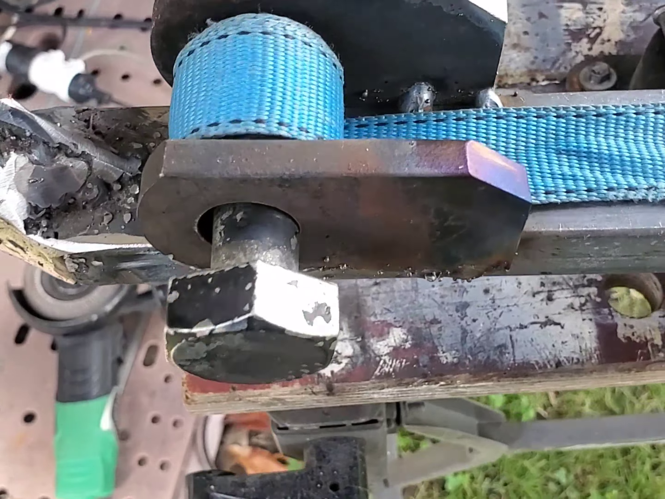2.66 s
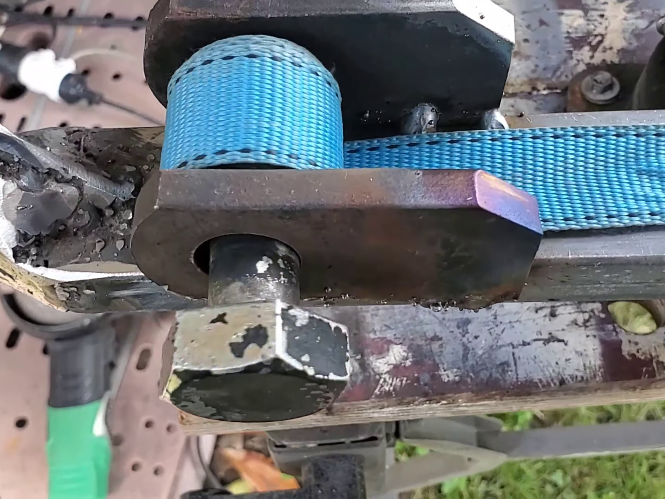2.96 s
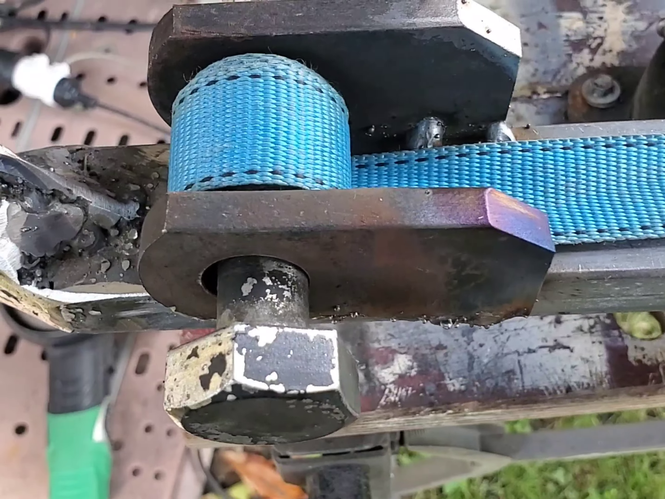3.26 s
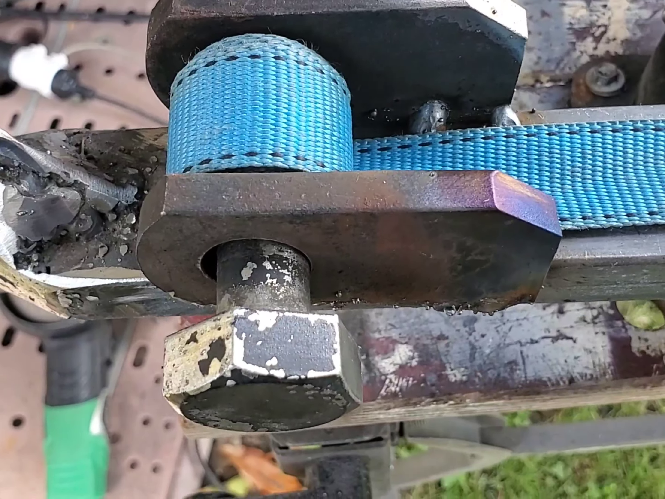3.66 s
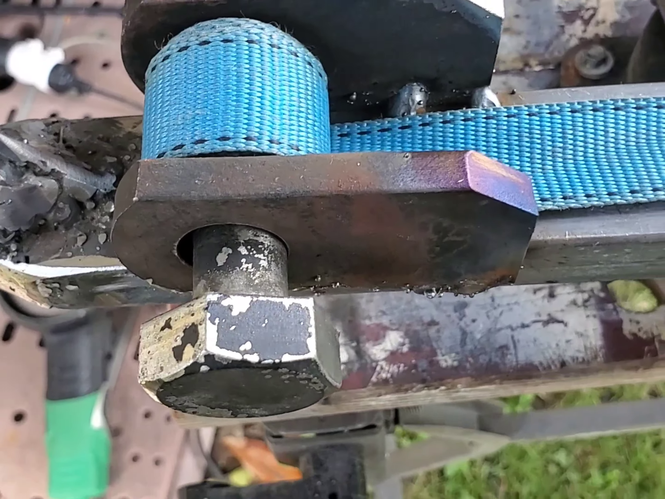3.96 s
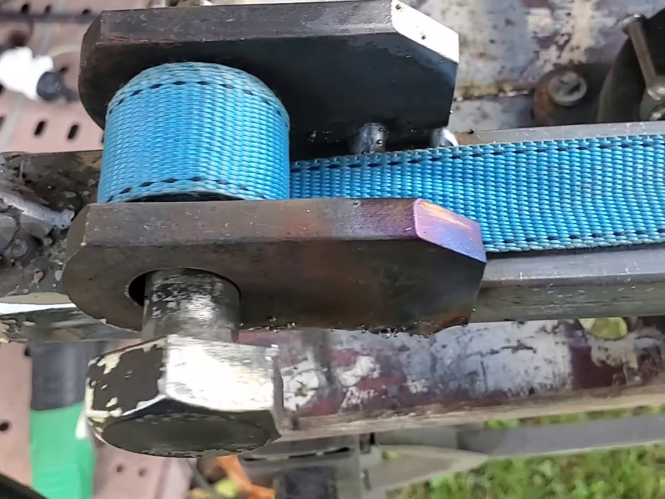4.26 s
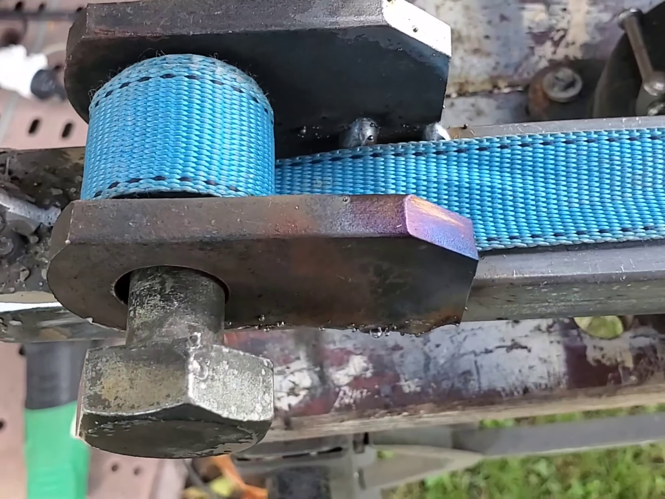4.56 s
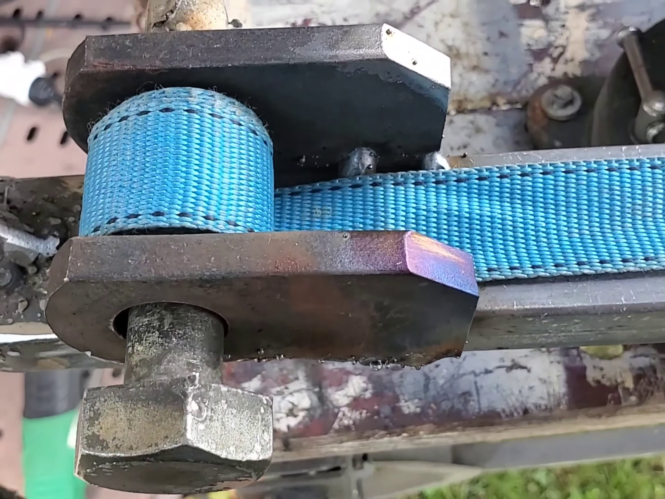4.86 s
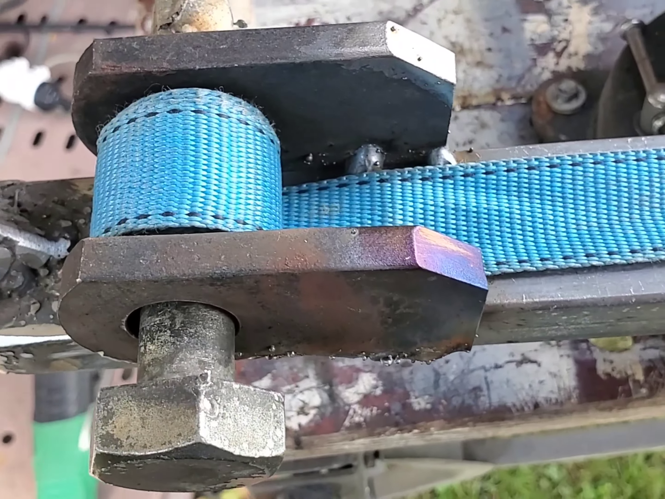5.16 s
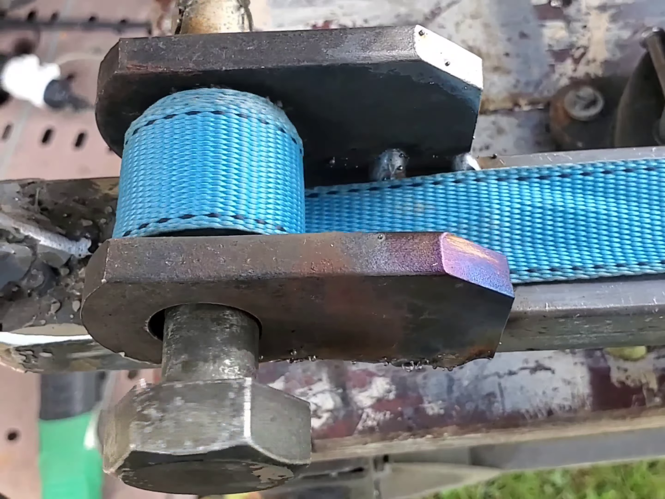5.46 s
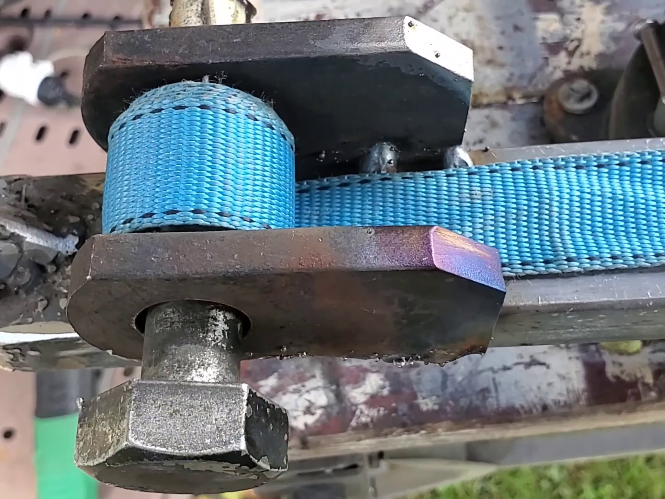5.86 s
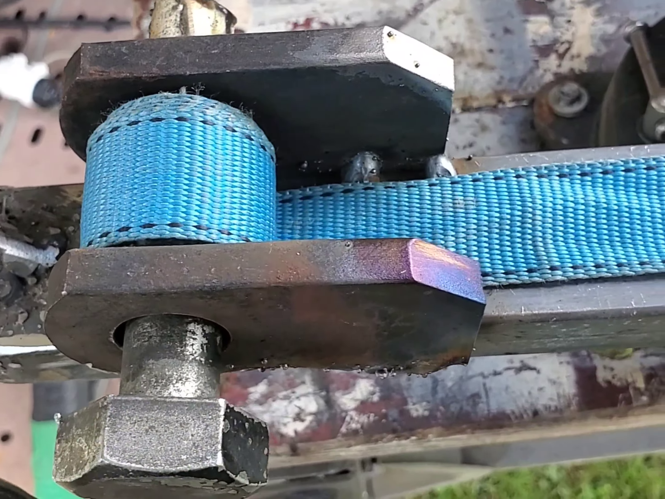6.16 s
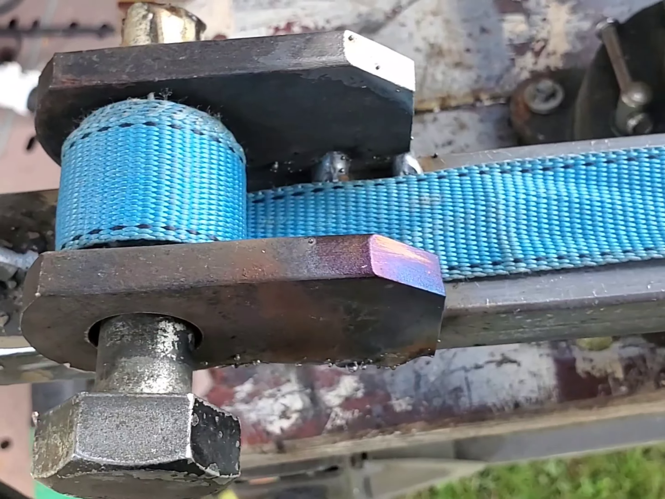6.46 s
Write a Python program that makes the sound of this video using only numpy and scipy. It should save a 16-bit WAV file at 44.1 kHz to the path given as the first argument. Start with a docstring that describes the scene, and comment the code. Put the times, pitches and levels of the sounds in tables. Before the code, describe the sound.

A steel ratchet tie-down clacks close up outdoors, sparse at first, then quick uneven metallic clicks with light scraping over a faint engine hum.

```python
"""A pawl clacks into a ratchet tooth at once and the small steel frame of a strap winch rings on, outdoors, close
to the microphone. Drops, rebounds, ticks and knocks are short noise cracks with a dense noise ring and decaying
sine modes. Between the teeth the parts scrape faintly: uneven noise coloured by the same steel modes.
Far off, an engine hums as a wandering tone with its octave, over a low rumble and a traffic wash of shaped noise."""
import sys
import numpy as np
from scipy import signal
from scipy.fft import rfft, irfft, next_fast_len
from scipy.io import wavfile
from scipy.ndimage import uniform_filter1d, map_coordinates

SR = 44100
rng = np.random.default_rng(int(sys.argv[2]) if len(sys.argv) > 2 else 0)


def digitize_waveform(pressure):
    """Quantize a signal to 16-bit integers and store it at the path in sys.argv[1].

    Rows of a 2-D input are taken as channels; values are limited to [-1, 1].
    """
    field = np.atleast_2d(pressure).T
    bounded = np.clip(field, -1, 1)
    quanta = np.round(bounded * 32767).astype(np.int16)
    wavfile.write(sys.argv[1], SR, quanta)


N = 292381  # length [samples]


def amp(db):
    """Decibels to linear gain."""
    return 10 ** (np.asarray(db) / 20)


def unit(x):
    """Scale a signal to rms 1."""
    return x / np.sqrt(np.mean(x ** 2) + 1e-20)


def along(points, hz):
    """Read a (frequency, value) curve at hz, straight between points on a log frequency axis."""
    point_hz, value = np.transpose(points)
    return np.interp(np.log(hz + 1), np.log(point_hz + 1), value)


def curves(rows):
    """Draw each column after the time as one value per sample."""
    seconds, *columns = np.transpose(rows)
    return [np.interp(np.arange(N) / SR, seconds, column) for column in columns]


def wobble(rate):
    """Smooth random curve with rate knots a second."""
    knots = rng.standard_normal(int(N * rate / SR) + 4)
    return map_coordinates(knots, [np.arange(N) * rate / SR])


# likeness of the left and right channels: (frequency [Hz], correlation [-1 to 1])
LIKENESS = [(40, .6), (70, .85), (130, .93), (290, .86), (640, .6), (1400, .53), (3100, -.2), (7000, -.15),
            (15000, .2)]


def pair(count, gain, lean=((1, 0),)):
    """Stereo noise coloured by gain(Hz), alike in the bass and nearly unrelated in the treble; rms 1."""
    m = next_fast_len(count)
    hz = np.fft.rfftfreq(m, 1 / SR)
    turn = np.arccos(np.clip(along(LIKENESS, hz), -1, 1)) / 2
    spectra = rfft(rng.standard_normal((2, m))) * gain(hz)
    mid, side = spectra * [np.cos(turn), np.sin(turn)]
    balance = amp(along(lean, hz) * [[.5], [-.5]])
    return unit(irfft([mid + side, mid - side] * balance, m)[:, :count])


# the open air around the winch: (time [s], rumble level [dB], traffic level [dB])
OUTDOOR_LEVELS = [(0, -57.5, -56), (.7, -53.5, -59.5), (1.2, -59.5, -63.5), (2.4, -57, -58),
                  (3.3, -59, -60.5), (4.7, -51.5, -60), (5.8, -54.5, -57), (6.63, -59, -58)]
# colour of the low rumble: (frequency [Hz], level [dB per Hz])
RUMBLE_COLOUR = [(20, -42), (33, -15.5), (42, 1), (60, 0.5), (90, -2), (140, -30.5), (260, -42)]
# colour of the far traffic: (frequency [Hz], level [dB per Hz])
TRAFFIC_COLOUR = [(65, -44), (110, -3), (150, -6.5), (214, -5.5), (317, -11), (510, -8), (930, -19.5),
                  (1530, -28), (3900, -25.5), (9000, -33.5), (15600, -50)]


def outdoors():
    """Lumpy rumble and the wash of far traffic: two shaped noises, a touch stronger on the right."""
    rumble_db, traffic_db = curves(OUTDOOR_LEVELS)
    rumble = amp(rumble_db + 0.8 * wobble(6.6)) * pair(N, lambda hz: amp(along(RUMBLE_COLOUR, hz)))
    wash = amp(traffic_db + 0.71 * wobble(7)) * pair(N, lambda hz: amp(along(TRAFFIC_COLOUR, hz)))
    return (rumble + wash) * amp([[-.4], [.4]])


# the far engine's low tone, before its wobbles: (time [s], pitch [Hz], level [dB])
ENGINE_TONE = [(0, 79, -63.5), (1.15, 81, -68), (1.75, 78.6, -62.5), (2.15, 75.97, -52),
               (2.75, 75.93, -54.5), (3.25, 80, -52), (3.5, 82.2, -66.5), (3.75, 83.2, -65),
               (4.08, 87.6, -54), (4.3, 88, -66), (4.45, 90.3, -53.5), (5, 94.4, -56), (5.2, 94.1, -45),
               (5.61, 93.8, -59.5), (5.82, 93.5, -48.5), (6.06, 90, -61), (6.63, 88.5, -66.5)]
# the octave against the tone, lifted as it crosses an exhaust boom
OCTAVE_DB, BOOM_DB, BOOM_HZ, BOOM_WIDTH_HZ = -15, 9.5, 163, 8.9


def engine():
    """A far engine: an unsteady low tone and its octave, a little off to the right."""
    hz, tone_db = curves(ENGINE_TONE)
    boom_db = BOOM_DB / (1 + ((2 * hz - BOOM_HZ) / BOOM_WIDTH_HZ) ** 2)
    octave_db = tone_db + OCTAVE_DB + boom_db
    wandering_hz = hz * (1 + 0.0083 * wobble(23))
    phase = 2 * np.pi * np.cumsum(wandering_hz) / SR + [[.15], [-.15]]  # left leads
    tone = amp(tone_db + 2.6 * wobble(9)) * np.sin(phase)
    octave = amp(octave_db + 3.7 * wobble(7.2)) * np.sin(2 * phase)
    return np.sqrt(2) * (tone + octave) * amp([[-.4], [.4]])


# drag between the teeth: (time [s], level [dB])
SCRAPE_LEVEL = [(0, -61.5), (.4, -52.5), (.7, -55), (.9, -79), (1.08, -59.5), (1.25, -72.5), (1.52, -57.5),
                (1.65, -64), (2.1, -60.5), (2.58, -46.5), (2.8, -55.5), (3.45, -57), (3.68, -46),
                (3.98, -58.5), (4.8, -54.5), (5.33, -55), (5.7, -52), (5.86, -48), (6.03, -52.5),
                (6.63, -55.5)]
# colour of the drag before the steel sings: (frequency [Hz], level [dB per Hz])
RUB_COLOUR = [(350, -26), (600, -6.5), (1810, -6), (2070, -11), (3340, -6.5), (3780, -5), (5460, -18.5),
              (6520, -16), (15600, -23)]


def scrape():
    """Pawl and strap drag between the teeth: uneven grit, with resonant peaks at the steel modes."""
    level_db, = curves(SCRAPE_LEVEL)

    def sing(f):
        return 1 + sum(amp(12 + db) / (1 + ((f - hz) / 30) ** 2) for hz, db, *_ in STEEL_MODES)

    grit = amp(3 * wobble(25) + 2.2 * wobble(140))  # slow and fine unevenness
    rub = pair(N, lambda hz: amp(along(RUB_COLOUR, hz)) * sing(hz))
    return amp(level_db) * unit(grit * rub)


def colour(hz, bright_db, body_db):
    """What a contact favours: treble against bass about 6.5 kHz, and clack around 1.6 kHz."""
    treble = np.tanh(1.68 * np.log((hz + 1) / 6500)) / 2
    body = np.exp(-(np.log((hz + 1) / 1600) / 0.5) ** 2)
    return amp(bright_db * treble + body_db * body)


# clear modes of the steel frame: (frequency [Hz], level on a winding stroke [dB], level on a return stroke [dB],
# time to fall 60 dB [s] before a common stretch, phase by which left leads [rad] before random spread)
STEEL_MODES = [(388, -14, -28, 0.22, -0.1), (920, -20, -18, 0.2, 2.0), (1060, -19, -24, 0.2, 1.0),
               (1399, -17, -28, 0.2, 1.8), (1668, -14, -16, 0.13, 1.3), (2051, -14, -9, 0.11, -0.6),
               (2330, -10, -10, 0.13, 0.9), (3003, -1, -4, 0.2, 0.6), (3299, -4, -9, 0.23, 2.8),
               (3577, -10, -11, 0.22, 0.7), (4080, -8, -5, 0.19, 1.0), (4200, -9, -6, 0.25, 1.7),
               (4548, -10, -5, 0.19, -2.9), (4705, -7, -9, 0.21, 0.7), (4850, -15, -11, 0.23, -0.8),
               (5227, -8, -7, 0.18, -1.2), (5302, -4, -7, 0.15, 0.6), (5496, -7, -9, 0.21, -2.7),
               (5763, -7, -5, 0.15, -2.8), (6086, -13, -9, 0.2, 0.6), (6208, -14, -9, 0.2, 1.6),
               (6548, -12, -1, 0.15, -2.8), (6785, -15, -14, 0.22, -2.4), (6950, -12, -10, 0.24, 0.9),
               (7638, -14, -15, 0.19, -2.8), (8538, -12, -13, 0.15, 0.7), (8769, -13, -14, 0.18, -1.1),
               (9140, -14, -17, 0.17, 0.3), (10518, -20, -12, 0.18, -2.5)]


def ringing(t, winding, bright_db, body_db):
    """The steel modes at new strengths; loose joints let their phase wander, so none rings like glass."""
    hz, winding_db, return_db, t60, lead = np.transpose(STEEL_MODES)[:, :, None]
    count = len(STEEL_MODES)
    strength, start_phase, spread = rng.standard_normal((3, count, 1))
    steps = rng.standard_normal((count, len(t) // 64 + 1))
    wander = np.cumsum(steps, 1).repeat(64, 1)[:, :len(t)]  # a random step every 64 samples
    level_db = (winding_db if winding else return_db) + 7.5 * np.tanh(.6 * strength)
    decay = amp(level_db - 60 * t / (1.065 * t60))
    build_up = 1 - np.exp(-t * hz / 6)  # over about six cycles
    envelope = decay * colour(hz, bright_db, body_db) * build_up
    phase = 2 * np.pi * hz * t + 2 * start_phase + .22 * hz / 5000 * wander
    half_lead = (lead + .5 * spread) / 2
    return np.array([np.sum(envelope * np.sin(phase + side * half_lead), 0) for side in (1, -1)])


# In the contact tables strength, ring, brightness and body are drive values; pawl() trims them for each layer.
# the pawl drops into a tooth:
# (time [s], strength [dB], rise [ms], ring against strength [dB], brightness [dB], body [dB])
TOOTH_DROPS = [(0.0, -19, .52, 2, 1.5, 7), (0.4168, -7, 1.1, -5, -4, -1.5), (0.5581, -8, 2, -4.5, 0.5, 6),
               (1.3475, -20, 1.6, -15.5, 14, 1.5), (1.669, -11.5, 5.9, -1.5, 4.5, 7.5),
               (1.8871, -6, 2.9, -7.5, 1, 5.5), (2.0534, -20, 1.9, -10, 12, 12.5),
               (2.2385, -22.5, 0.85, -2, 0, 9), (2.2594, -14.5, 2.6, 4, -1, -1),
               (2.3884, -12, 1.3, 0.7, -3, -4), (2.5061, -11.5, 3.3, -6.5, 9, 12.5),
               (2.859, -11, 5.1, -4, -0.5, 2.2), (3.0073, -11, 2, -3, -4.5, -2.5),
               (3.1994, -13, 3.1, -6.5, 9, 1), (3.364, -25.5, 8.1, -5.5, -1, 3.5),
               (3.5847, -16, .6, 4, -5, -5), (3.7171, -9.5, 1.6, -4, 0, 0.7),
               (3.8591, -7.5, 6.8, -12, 8.5, 14.5), (4.183, -14, 3.2, -3, 2, 1),
               (4.3183, -7, 5, -5, 6.5, 9), (4.4818, -12.5, 2.7, -5.5, -0.5, 0.5),
               (4.6516, -14.5, 1.69, -17, 8, 5), (4.7002, -15, 2.9, -7.5, 8, 9.5),
               (4.8708, -9.5, 1.5, -3, -2.5, 2), (4.9894, -11, 1.4, -2, -0.5, 5.5),
               (5.137, -9.5, 4.1, -14, 10.5, 12), (5.4319, -6, 5.9, -6.5, -6.5, 1.5),
               (5.5431, -15, 10.6, -1.5, 0.5, 9), (5.696, -10.5, 3.8, -5.5, 7.5, 6.5),
               (5.8775, -6, 1.6, -13, 8.5, 5.5), (5.98, -26.5, 2.2, -16, -3, -1),
               (6.073, -14.5, 8.3, 1.5, -1.5, -0.5), (6.2329, -14.5, 10, -1.5, 4, 14.5),
               (6.3728, -9.5, 1.44, -9.5, 4, 5)]
# the pawl rebounds after some drops: (time [s], strength [dB])
PAWL_REBOUNDS = [(.0095, -17), (1.9126, -15.5), (2.2826, -22), (3.02, -9), (4.4958, -14.5), (5.4445, -11.5),
                 (5.909, -25), (6.249, -24.5), (6.2646, -14.5)]
# shared by all rebounds: (rise [ms], ring against strength [dB], brightness [dB], body [dB])
REBOUND_SOUND = (2.2, -21.5, 6, 5)
# light ticks of loose parts, many just ahead of a drop as the pawl leaves the tooth tip:
# (time [s], strength [dB], brightness [dB])
LOOSE_TICKS = [(0.1531, -42, -24.5), (0.1846, -33, -8.5), (0.228, -45.5, 1), (0.304, -41.5, -9),
               (0.919, -58.5, -2), (1.013, -54, -14), (1.108, -54, -17), (1.431, -38.5, 4), (1.454, -30, 9),
               (1.481, -39, -28), (1.508, -42, 5), (1.6456, -35, 5), (1.874, -38.5, 3), (2.0327, -41, -28),
               (2.662, -41, -9), (2.69, -39.5, -1), (3.1697, -27, 24), (3.4007, -29, -1), (3.4138, -35, 4),
               (3.5774, -32, 1), (3.7124, -24, -6), (3.843, -37, -3), (4.0052, -38.5, 3),
               (4.0338, -39.5, -2), (4.171, -27.5, 4), (4.303, -27.5, 3), (4.465, -31.5, 0),
               (4.9758, -32, 2), (5.2689, -43, -5), (5.2874, -37.5, -4), (5.414, -23, 7), (5.4222, -18, 4),
               (5.5334, -26.5, 1), (5.6782, -32.5, -1.5), (6.212, -35.5, -2), (6.4897, -37.5, 3.5),
               (6.5057, -34.5, 8)]
TICK_RISE_MS, TICK_RING_DB, TICK_BODY_DB = 3.3, -4.5, 6.5
# dull knocks of the handle against the frame: (time [s], strength [dB])
HANDLE_KNOCKS = [(1.5076, -50), (5.941, -43), (6.5301, -37)]
# shared by all knocks: (rise [ms], ring against strength [dB], brightness [dB], body [dB])
KNOCK_SOUND = (5.5, -16.5, -21, 26)


def contacts():
    """Every blow, from drops to knocks, as a row with the columns of the drops."""
    ticks = [(s, db, TICK_RISE_MS, TICK_RING_DB, bright_db, TICK_BODY_DB)
             for s, db, bright_db in LOOSE_TICKS]
    rebounds = [(*row, *REBOUND_SOUND) for row in PAWL_REBOUNDS]
    knocks = [(*row, *KNOCK_SOUND) for row in HANDLE_KNOCKS]
    return TOOTH_DROPS + ticks + rebounds + knocks


# colour of the crack: (frequency [Hz], level [dB per Hz])
CRACK_COLOUR = [(290, -49), (500, -36.5), (1850, -18.5), (4150, 3), (4930, -7), (6970, -7), (7600, -12),
                (8770, -5.5), (11400, -7.5), (15600, -9)]
# balance of the crack between the channels: (frequency [Hz], left over right [dB])
CRACK_LEAN = [(500, -2.5), (1500, 8.5), (4000, -1), (8000, 10.5), (15000, 6)]
CRACK_ABOVE_HZ = 870  # the crack is cut below this, so it carries no bass


def crack_noise(t, onset, rise_ms, bright_db, body_db):
    """The blow itself: treble-heavy noise roughened by tiny rebounds, falling 60 dB in 30 ms after its rise."""
    crack = pair(len(t), lambda hz: amp(along(CRACK_COLOUR, hz)) * colour(hz, 1.42 * bright_db, body_db),
                 CRACK_LEAN)
    count = 60
    chatter = np.interp(t, np.arange(count) * 0.0014, np.tanh(rng.standard_normal(count)))  # tiny rebounds
    late = np.maximum(t - rise_ms / 1000, 0)
    crack *= amp(-2 + 2.62 * chatter - 60 * late / 0.03)
    high_pass = signal.butter(4, CRACK_ABOVE_HZ, "high", fs=SR, output="sos")
    return signal.sosfilt(high_pass, onset * crack)


# the frame's crowd of small modes: (frequency [Hz], level [dB per Hz])
DENSE_COLOUR = [(290, -50), (500, -22), (727, -40.5), (1070, -14), (1510, -16.5), (3860, -2.5),
                (4150, -3.5), (5530, -5.5), (6300, -5.5), (7600, -11), (15600, -10.5)]
# how long that crowd rings: (frequency [Hz], time to fall 60 dB [s])
DENSE_FADE = [(500, 0.42), (1300, 0.15), (3500, 0.21), (7000, 0.22), (9500, 0.21), (15000, 0.18)]


def dense_ring(size, bright_db, body_db):
    """The frame's many small modes as noise, each frequency band dying away at its own rate."""
    strengths = rng.standard_normal(SR // 2 // 70 + 1)  # small modes about 70 Hz apart
    mode_hz = np.linspace(0, SR / 2, len(strengths))

    def gain(hz):
        crowd_db = 3.2 * np.interp(hz, mode_hz, strengths)
        return amp(along(DENSE_COLOUR, hz) + crowd_db) * colour(hz, 0.24 * bright_db, .8 * body_db)

    hz, seconds, bands = signal.stft(pair(size, gain), SR, nperseg=128)
    # each blow wakes other clusters of modes, and small rattles break up the tail
    cluster = 1.4 * np.tanh(rng.standard_normal((len(hz), 1)))
    rattle = uniform_filter1d(rng.standard_normal(bands.shape[1:]), size=10, axis=0)
    fade_db = 60 * seconds / along(DENSE_FADE, hz)[:, None]
    bands = bands * amp(3.54 * cluster + 3.1 * unit(rattle) - fade_db)
    return signal.istft(bands, SR, nperseg=128)[1][:, :size]


# strokes that wind the strap, the others swing back: (start [s], end [s])
WINDING_STROKES = [(0, .1), (1.4, 2.1), (2.8, 3.5), (4.1, 4.6), (5.35, 5.8)]


def pawl():
    """Each contact close to the microphone: a short crack, then the frame's dense ring and clear modes."""
    size = SR // 4  # each contact sounds for a quarter second
    out = np.zeros((2, N + size))
    t = np.arange(size) / SR
    for s, db, rise_ms, ring_db, bright_db, body_db in contacts():
        onset = np.clip(t / (max(rise_ms, .3) / 1000), 0, 1) ** 1.1
        crack = crack_noise(t, onset, rise_ms, bright_db, body_db)
        dense = dense_ring(size, bright_db, body_db)
        winding = any(start <= s < end for start, end in WINDING_STROKES)
        clear = amp(-8.0) * ringing(t, winding, 0.98 * bright_db, body_db)
        ring = onset * amp(ring_db - 7.5) * (dense + clear)
        first = round(s * SR)
        out[:, first:first + size] += amp(db) * (crack + ring)
    return out[:, :N]


def scene():
    """The winch outdoors: far background first, the close pawl last."""
    return outdoors() + engine() + scrape() + pawl()


# band limit of the sound, full to 15.7 kHz and almost nothing above 17 kHz: (frequency [Hz], gain [dB])
BAND_LIMIT = [(15700, 0), (15950, -16), (16500, -22), (16984, -70), (17500, -110)]


def record(dry):
    """Peaks round off near full scale; the treble then ends steeply above 15.7 kHz."""
    wet = dry / (1 + np.abs(dry / .85) ** 6) ** (1 / 6)
    m = next_fast_len(N + SR // 4)
    gain = amp(along(BAND_LIMIT, np.fft.rfftfreq(m, 1 / SR)))
    return irfft(rfft(wet, m) * gain, m)[:, :N]


dry = scene()
out = record(dry)
digitize_waveform(out)
```